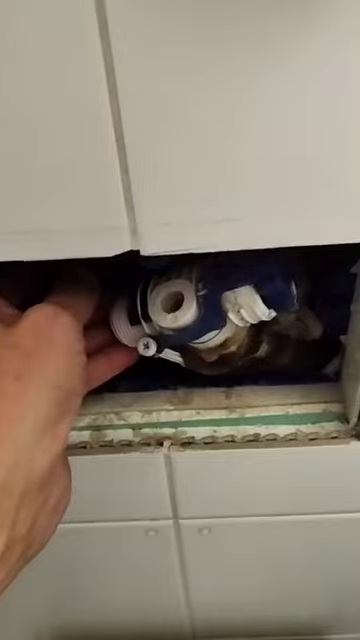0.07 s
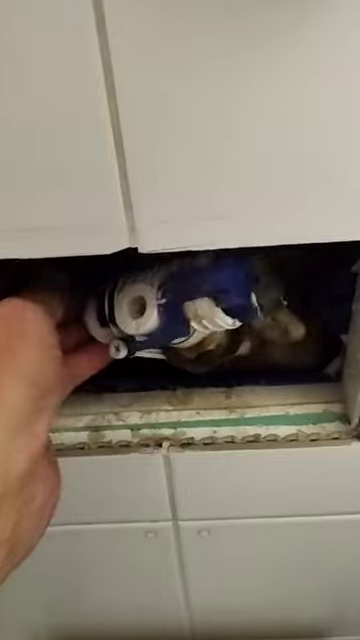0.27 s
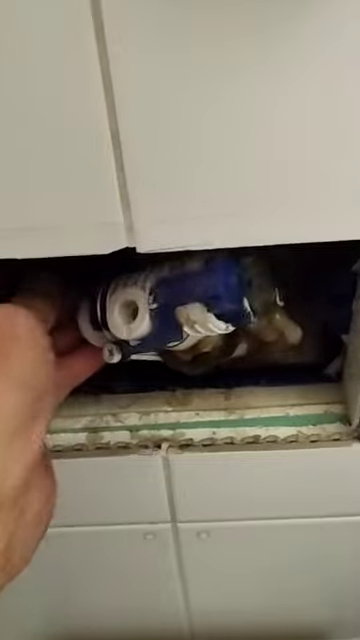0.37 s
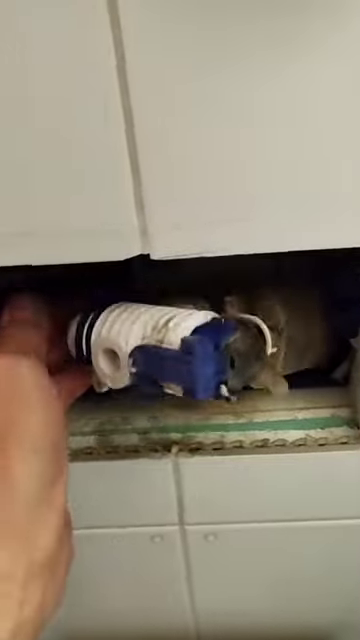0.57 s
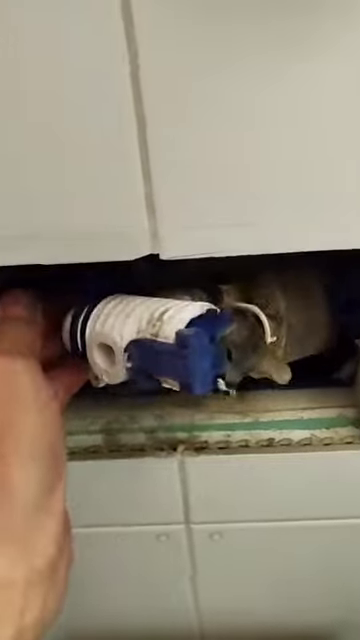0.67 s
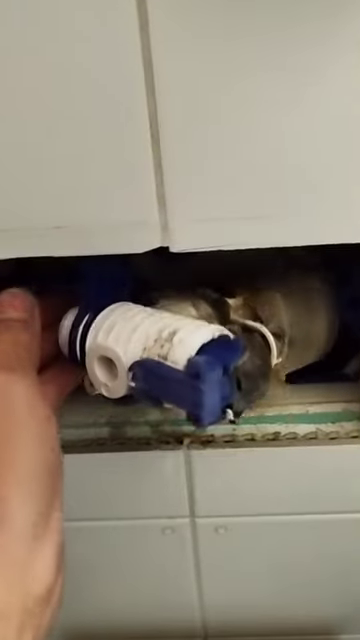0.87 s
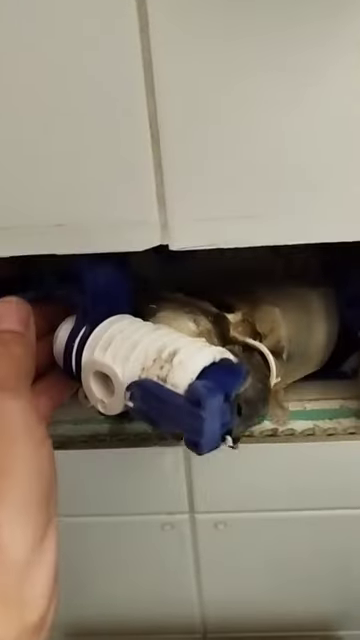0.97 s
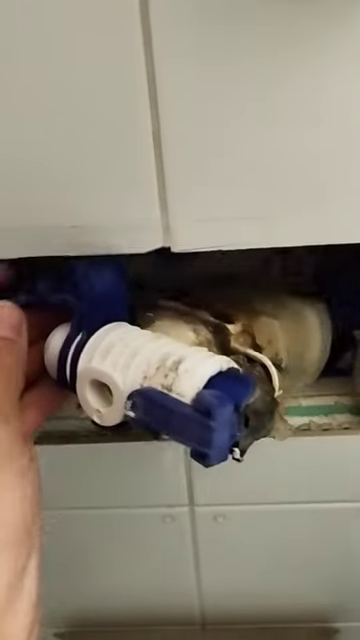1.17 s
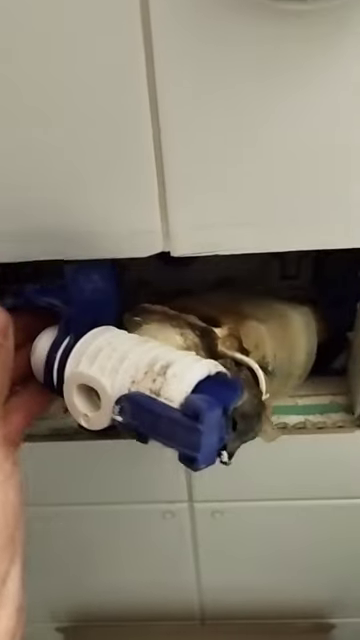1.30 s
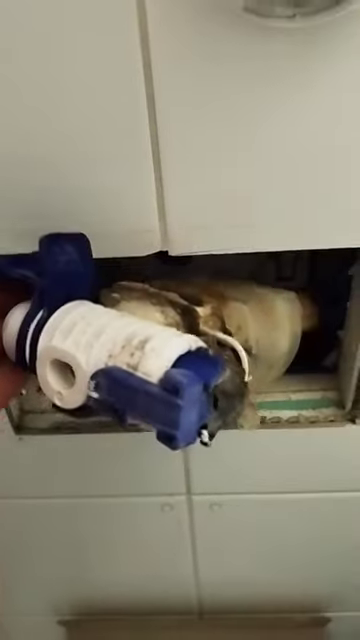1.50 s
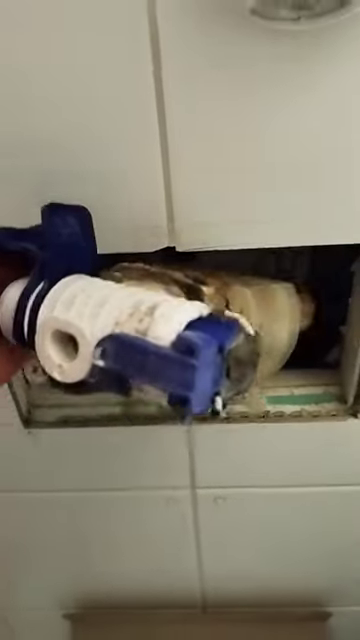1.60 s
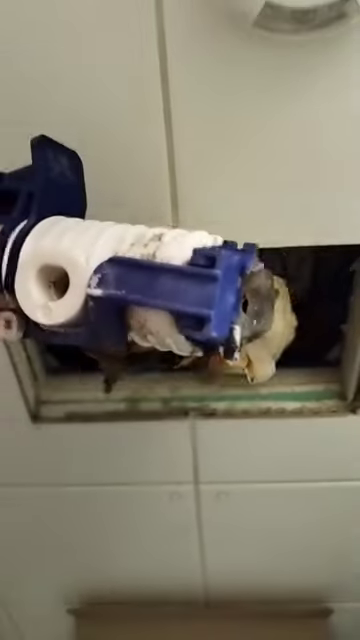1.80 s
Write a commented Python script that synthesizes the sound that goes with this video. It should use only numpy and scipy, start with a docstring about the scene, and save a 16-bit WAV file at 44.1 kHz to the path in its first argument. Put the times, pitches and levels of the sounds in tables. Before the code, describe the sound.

A plastic valve is pulled from a cistern, close by in a small tiled bathroom. After a light bump at 0.15 seconds, it scrapes, creaks and knocks hollowly on the tank from 0.3 to 0.65, loudest early on. At about 0.75 it clacks sharply on the rim and bounces twice, ringing briefly. A faint rub follows at 1 second, and a low ventilation rush continues until about 1.85.

```python
"""In a small bathroom, a plastic fill valve is worked out of a cistern behind a tiled wall, close by.
It scrapes along the opening, ticks, bumps the hollow tank and creaks as it sticks and slips,
then clacks on the rim and bounces twice. The tiles ring briefly after each clack.
Underneath lies a low, steady rush with wavering hums, like that of a ventilation duct."""
import sys
import numpy as np
from scipy import signal
from scipy.fft import rfft, irfft
from scipy.io import wavfile
from scipy.ndimage import uniform_filter1d

SR = 44100
rng = np.random.default_rng(int(sys.argv[2]) if len(sys.argv) > 2 else 0)


def wav_out(sig):
    """Save sig, one row per channel (or a flat mono array), as 16-bit PCM at SR to the path in sys.argv[1]."""
    wavfile.write(sys.argv[1], SR, np.round(np.clip(np.atleast_2d(sig).T, -1, 1) * 32767).astype(np.int16))


N = 81585
T = np.arange(N) / SR

# colour of the air bed: freq_hz, density_db
AIR_SPECTRUM = [(25, 4.5), (45, -18.5), (80, -0.5), (130, 1), (185, -5.5), (300, -3), (410, -7), (520, -9),
                (680, -6.5), (930, -17.5), (1200, -15.5), (1750, -22), (2500, -22.5), (3500, -24.5),
                (4200, -25), (5500, -31.5), (6800, -30.5), (8300, -40), (11000, -41.5), (15000, -52)]
# how alike the bed is in both ears: freq_hz, correlation
AIR_CORRELATION = [(60, -0.066), (150, 0.96), (320, 0.93), (600, 0.29), (1200, -0.26), (3000, -0.057),
                   (12000, -0.079)]
# lean of the rush: freq_hz, left_minus_right_db
AIR_PAN = [(60, 8.5), (130, -1.5), (380, -1.5), (700, -1), (1300, -3), (2400, -5), (4400, -2.5), (8000, -4),
           (15000, 6.5)]
# fader ride on the whole bed: time_s, gain_db
AIR_RIDE = [(0.12, -17), (0.15, -1.5), (0.22, -4), (0.35, 1.5), (0.65, 1), (1.1, 1.5), (1.6, 1.5),
            (1.85, 0.5)]
# duct resonances: pitch_hz, half_width_hz, level_db, left_minus_right_db
DUCT_BANDS = [(352.5, 17, -58.5, 6), (408, 2.3, -60.5, -0.5), (501.6, 21, -65.5, 7), (550.6, 5, -65.5, -5),
              (677.7, 3.6, -68, 0), (2253, 250, -66, -6.5), (2854, 200, -66.5, -1.5)]
# swells of the deepest duct hum: time_s, level_db
HUM_ENVELOPE = [(0.55, -52), (0.654, -41.5), (0.694, -50), (0.738, -39), (0.778, -65), (0.802, -41),
                (1.026, -49.5), (1.08, -37.5), (1.11, -43.5), (1.15, -52), (1.276, -42.5), (1.306, -56),
                (1.34, -37), (1.39, -44), (1.49, -53.5), (1.55, -40.5), (1.605, -45), (1.646, -52),
                (1.85, -49)]
# irregular throb of a higher duct tone: time_s, level_db
THROB_ENVELOPE = [(0.5, -50.5), (0.555, -45), (0.585, -49.5), (0.635, -42.5), (0.755, -52.5), (0.78, -52.5),
                  (1.0, -52), (1.1, -56), (1.15, -44.5), (1.19, -65), (1.225, -50.5), (1.26, -54),
                  (1.45, -56.5), (1.505, -42.5), (1.57, -58.5), (1.645, -43.5), (1.71, -52.5), (1.85, -44)]
# plastic sliding on the edge of the opening: time_s, level_db
SCRAPE_ENVELOPE = [(0.14, -64), (0.215, -75), (0.26, -49), (0.295, -50.5), (0.312, -44.5), (0.34, -49),
                   (0.38, -63), (0.46, -69), (0.54, -58.5), (0.59, -50.5), (0.63, -53.5), (0.66, -64),
                   (1.0, -70)]
# colour of the scrape: freq_hz, density_db
SCRAPE_SPECTRUM = [(250, -25), (700, 21), (1200, 1.5), (2300, 2.5), (3500, -3.5), (6000, -4.5), (9500, -8),
                   (14500, -19)]
# the tank groaning under the slide: time_s, level_db
GROAN_ENVELOPE = [(0.15, -58), (0.23, -45), (0.27, -34), (0.33, -41), (0.42, -60), (0.55, -42.5),
                  (0.64, -40.5), (0.7, -69.5)]
# a last faint rub after the bounces: time_s, level_db
RUB_ENVELOPE = [(0.94, -67), (0.975, -57), (1.035, -57), (1.065, -70)]
# handling rumble: time_s, level_db
RUMBLE_ENVELOPE = [(0.14, -91), (0.3, -47), (0.36, -48), (0.45, -67), (0.74, -50), (0.8, -37),
                   (0.88, -51.5), (1.0, -49), (1.2, -63), (1.85, -51)]
# colour of the rumble: freq_hz, density_db
RUMBLE_SPECTRUM = [(15, -8), (28, 3.5), (48, -38), (70, 0), (90, -15.5), (200, -58)]
# ticks of loose parts: start_s, level_db, ring_hz, ring_over_tick_db
TICK_HITS = [(0.140, -58, 4200, 0), (0.1505, -56, 9500, -5), (0.3404, -35.5, 5500, -17),
             (0.4855, -59, 9700, -7), (0.6265, -54, 13000, -4)]
# colour of a tick: freq_hz, density_db
TICK_SPECTRUM = [(400, -4), (1100, 23.5), (2500, -10), (4000, 1), (6000, 2), (9500, 0.5), (15000, -21)]
# soft bumps on the tank: start_s, level_db, contact_ms
BUMP_HITS = [(0.151, -32, 0.64), (0.3064, -33, 2.5), (0.3264, -22, 4.3), (0.3411, -19.5, 1.01),
             (0.3705, -28, 2.64), (0.413, -30, 4.8), (0.4412, -26, 4.31), (0.626, -41.5, 1.3),
             (0.7735, -31, 4.9), (0.804, -35, 4)]
# hollow body of the tank: pitch_hz, level_db, t60_s
TANK_MODES = [(128, -21, 0.16), (172.6, -21, 0.52), (213.2, 11, 0.073), (256.4, -4.5, 0.15),
              (285.7, -4, 0.13), (301, -31, 0.21), (406.6, -19.4, 0.24), (692, -3.5, 0.083),
              (733, -12, 0.15)]
# standing waves of the recess and the room: pitch_hz, level_db, t60_s
BOOM_MODES = [(74.35, -6, .33), (181.4, 3, 0.52), (210, -14.5, 0.91)]
# dull thud around each bump: freq_hz, density_db
THUD_SPECTRUM = [(30, -14), (100, -13), (220, 19), (400, -6), (700, 2), (1200, -3), (3000, -8),
                 (9000, -19.5)]
# slips on the edge, then a rattle after the big bump: start_s, level_db, contact_ms
SLIP_HITS = [(0.3025, -48, .3), (0.3085, -41, .8), (0.3148, -38, .15), (0.3175, -43, .1),
             (0.3242, -45, .12), (0.3455, -37, .9), (0.3675, -39, .8), (0.376, -45, .8), (0.543, -46, 1.0)]
# ring of the plastic at each slip: pitch_hz, level_db, t60_s
CREAK_MODES = [(705, -4, .05), (910, -7, .04), (1110, -3, .035), (1320, -3, .025), (2070, -12, .04),
               (2235, 2, .06), (2740, -18, .03)]
# crushed grit: freq_hz, density_db
GRIT_SPECTRUM = [(300, -23), (700, -4), (1250, 12), (1750, -17), (2250, 1), (2800, 4), (6000, -26),
                 (14000, -29)]
# hard clacks on the rim: start_s, level_db, contact_ms, spot_pitch_hz, spot_ring_db, spot_t60_s
CLACK_HITS = [(0.7631, -26.3, .05, 1455, -19, .18), (0.8365, -35, .16, 1560, -12, .07),
              (0.8955, -42, .33, 1620, -2, .06)]
# quickly damped body of the valve: pitch_hz, level_db, t60_s
VALVE_MODES = [(1020, -3, .014), (1370, -4, .012), (1740, 1.5, .012), (2060, -6, .011), (2640, -10, .008),
               (3800, -22, .006), (4430, -21, .006), (5560, -24, .006)]
# longer ring of the rim: pitch_hz, level_db, t60_s
RIM_MODES = [(915, -26, .22), (1254, -26, .22), (1495, -25, .12), (1782, -26, .09), (1997, -26, .14),
             (2137, -26, .1), (2676, -30, .12), (3709, -35, .1)]
# crack of the plastic, also heard off the tiles: freq_hz, density_db
CRACK_SPECTRUM = [(300, -30), (700, -13), (980, 1), (1700, 7), (2300, -2), (3100, -12), (5500, -10.5),
                  (8000, -20), (11000, -24), (15000, -41)]


def undb(db):
    """Decibels to gain."""
    return 10 ** (np.asarray(db) / 20)


def envelope(rows):
    """Gain over time from points of time_s, level_db."""
    return undb(np.interp(T, *np.array(rows).T))


def over_hz(rows):
    """Points of freq_hz, value, read at every frequency bin."""
    hz, value = np.array(rows).T
    return np.interp(np.log(np.fft.rfftfreq(N, 1 / SR) + 1), np.log(hz), value)


def resonance(hz, half_width_hz):
    """Gain of a steep-sided resonance at every bin."""
    return 1 / (1 + ((np.fft.rfftfreq(N, 1 / SR) - hz) / half_width_hz) ** 2)


def noise(colour, correlation):
    """Stereo noise of rms 1, with a gain per bin and a correlation between the ears."""
    mid, side = rfft(rng.standard_normal((2, N)))
    c = np.clip(correlation, -1, 1)
    mid, side = mid * np.sqrt(1 + c), side * np.sqrt(1 - c)
    x = irfft(colour * np.array([mid + side, mid - side]), N)
    return x / x.std()


def wavering_tone(hz, half_width_hz, steadiness, correlation):
    """A narrow band of noise at rms 1; steadiness evens out its level."""
    band = noise(resonance(hz, half_width_hz), correlation)
    swell = np.abs(signal.hilbert(band)).mean(axis=0) + 0.34
    tone = band / swell ** steadiness
    return tone / tone.std()


def decay(t60_s):
    """An exponential tail, 60 dB down after t60_s."""
    return np.exp(-np.log(1000) * T / t60_s)


def ring(modes, rise_s=.0001):
    """The dying modes of a struck object, with a softened attack."""
    partials = sum(undb(db) * decay(t60) * np.cos(2 * np.pi * hz * T) for hz, db, t60 in modes)
    return (1 - np.exp(-T / rise_s)) * partials


def near(x, lag_s=0.00012):
    """A close source a little to the left reaches the right ear later."""
    return np.array([x, np.interp(T - lag_s, T, x, left=0)])


def strike(hits, response):
    """Each hit pushes on the stereo response: the longer the contact, the duller."""
    force = np.zeros(N)
    for start_s, db, contact_ms in hits:
        peak_s = contact_ms / 4000  # a quarter of the way into the contact
        age = np.maximum(T - start_s, 0) / peak_s
        push = age * np.exp(-age)
        force += undb(db) * push / push.sum()
    return signal.fftconvolve(response, force[None], axes=1)[:, :N]


def air():
    """The bed: a steady rush with duct resonances, a deep hum and a higher throb."""
    sides = np.array([[1], [-1]]) / 2
    correlation = over_hz(AIR_CORRELATION)
    colour = undb(over_hz(AIR_SPECTRUM) + sides * over_hz(AIR_PAN))
    rush = undb(-49) * noise(colour, correlation)
    duct = sum(undb(db + sides * pan_db) * noise(resonance(hz, half_width_hz), 0.87 * correlation)
               for hz, half_width_hz, db, pan_db in DUCT_BANDS)
    hum = wavering_tone(hz=133.2, half_width_hz=10, steadiness=1, correlation=1)
    throb = wavering_tone(hz=310.2, half_width_hz=15.4, steadiness=0.45, correlation=0.82)
    tones = hum * envelope(HUM_ENVELOPE) + throb * envelope(THROB_ENVELOPE)
    return (rush + duct + tones) * envelope(AIR_RIDE)


def sliding(grain_s=.002, grain_db=3):
    """Grainy friction of plastic on the edge: a scrape, the tank's groan and a last rub."""
    grain = uniform_filter1d(rng.standard_normal(N), int(grain_s * SR))
    grip = undb(grain_db * grain / grain.std())
    grip /= np.sqrt(np.mean(grip ** 2))
    scrape = noise(undb(over_hz(SCRAPE_SPECTRUM)), 0.17)
    groan = wavering_tone(hz=185, half_width_hz=37, steadiness=0.99, correlation=0.98)
    rub = wavering_tone(hz=1245, half_width_hz=150, steadiness=.7, correlation=0.2)
    friction = scrape * envelope(SCRAPE_ENVELOPE) + rub * envelope(RUB_ENVELOPE)
    return grip * friction + groan * envelope(GROAN_ENVELOPE)


def handling():
    """Handling adds a low rumble as the valve comes free."""
    return noise(undb(over_hz(RUMBLE_SPECTRUM)), 0.93) * envelope(RUMBLE_ENVELOPE)


def ticks():
    """Loose parts snap, each with one short, bright ring."""
    out = np.zeros((2, N))
    for start_s, db, ring_hz, ring_db in TICK_HITS:
        snap = noise(undb(over_hz(TICK_SPECTRUM)), 0.09)
        ping = undb(ring_db) * noise(resonance(ring_hz, half_width_hz=.06 * ring_hz), 0.13)
        burst = np.interp(T - start_s, T, decay(t60_s=0.039), left=0)
        out += undb(db) * (snap + ping) * burst
    return out


def tank_bumps():
    """Bumps knock the hollow tank; the recess booms after it, two close modes beating."""
    thud = undb(-7.5) * noise(undb(over_hz(THUD_SPECTRUM)), 0.13) * decay(t60_s=0.32)
    body = ring(TANK_MODES, rise_s=0.0033)
    boom = ring(BOOM_MODES, rise_s=0.017)
    return strike(BUMP_HITS, near(body + boom) + thud)


def creak():
    """The valve sticks and slips; each slip rings the plastic and crushes a little grit."""
    grit = undb(-7) * noise(undb(over_hz(GRIT_SPECTRUM)), 0.11) * decay(t60_s=.06)
    return strike(SLIP_HITS, near(ring(CREAK_MODES)) + grit)


def valve_clacks(chatter_s=.00175, chatter_db=4.5):
    """Each clack touches twice, ringing valve and rim; the recess and the tiles answer."""
    colour = undb(over_hz(CRACK_SPECTRUM))
    low_cut = signal.butter(4, 850, "high", fs=SR, output="sos")  # the valve's ring carries nothing below 850 Hz
    body = signal.sosfilt(low_cut, ring(VALVE_MODES, rise_s=.0003) + ring(RIM_MODES, rise_s=.0003))
    pan = undb([[1], [-1]])  # slightly left
    recess_tail = undb(-12.5) * decay(t60_s=0.095)
    tile_tail = undb(-27) * decay(t60_s=.25)
    out = np.zeros((2, N))
    for start_s, db, contact_ms, spot_hz, spot_db, spot_t60_s in CLACK_HITS:
        first = (start_s, db, contact_ms)
        second = (start_s + chatter_s, db + chatter_db, contact_ms)
        for contact in first, second:
            crack = undb(1) * noise(colour, 0.1) * decay(t60_s=0.008)
            room = noise(colour, 0.14) * (recess_tail + tile_tail)
            out += strike([contact], pan * (near(body) + crack) + room)
        spot = ring([(spot_hz, spot_db, spot_t60_s)])  # each spot on the rim has its own pitch
        out += strike([second], near(spot))
    return out


def scene():
    """The valve's noises over the air bed."""
    return air() + sliding() + handling() + ticks() + tank_bumps() + creak() + valve_clacks()


def record(dry, start_s=.133, fade_s=.012, top_hz=15450):
    """A quick fade-in after a moment of silence, and a steep cut of the top end."""
    fade_in = np.clip((T - start_s) / fade_s, 0, 1)
    high_cut = signal.ellip(8, .2, 70, top_hz, fs=SR, output="sos")
    return signal.sosfilt(high_cut, dry * fade_in)


dry = scene()
out = record(dry)
wav_out(out)
```